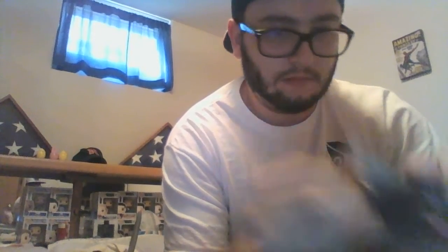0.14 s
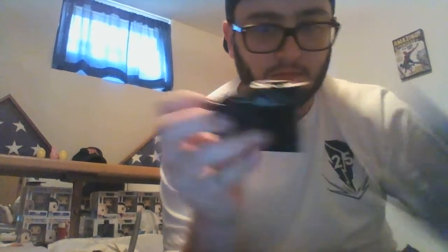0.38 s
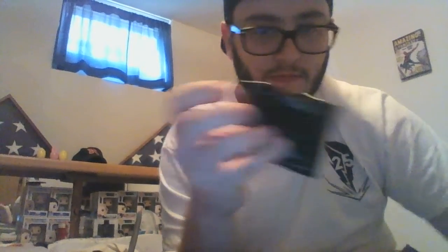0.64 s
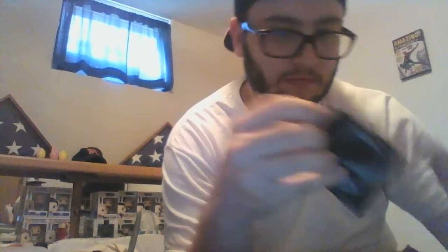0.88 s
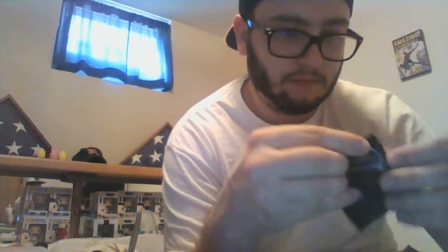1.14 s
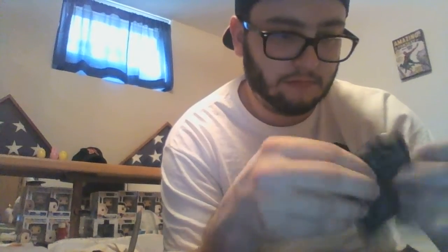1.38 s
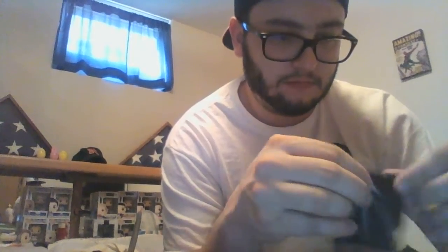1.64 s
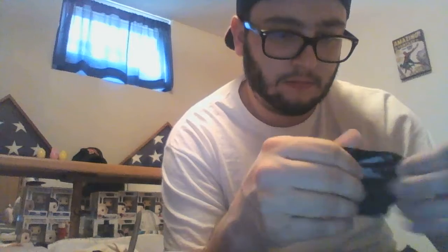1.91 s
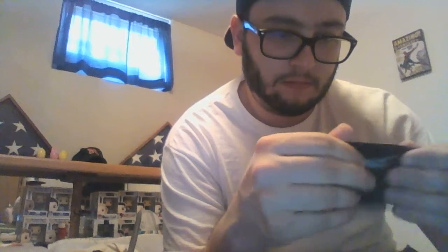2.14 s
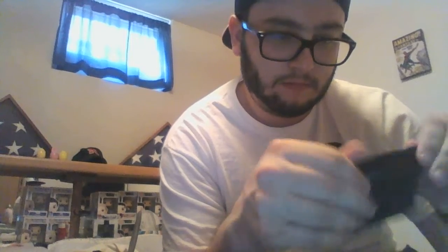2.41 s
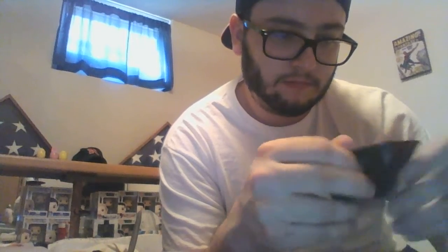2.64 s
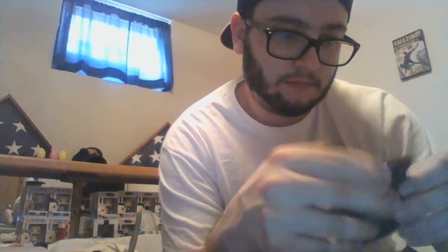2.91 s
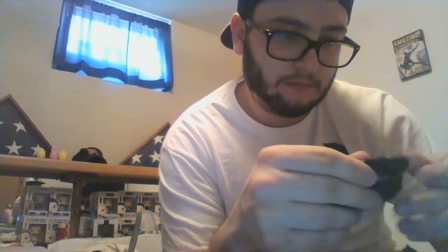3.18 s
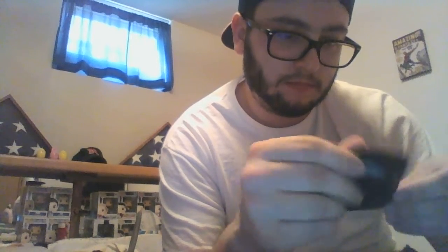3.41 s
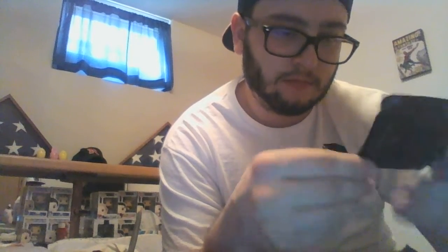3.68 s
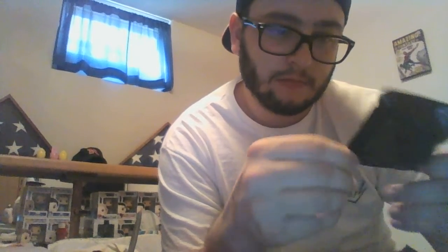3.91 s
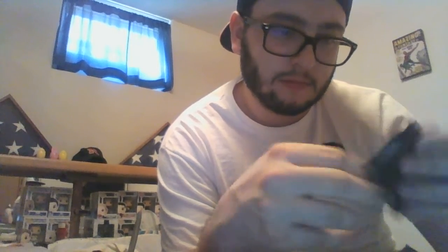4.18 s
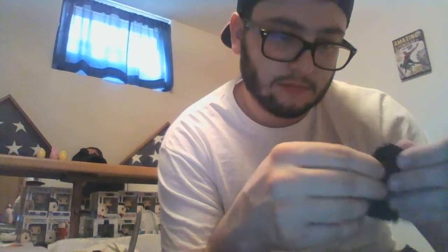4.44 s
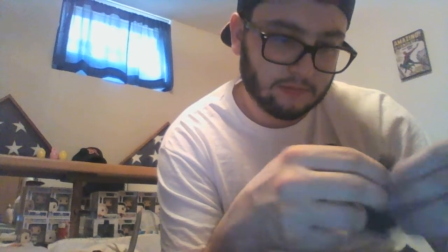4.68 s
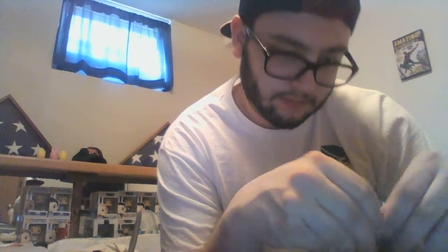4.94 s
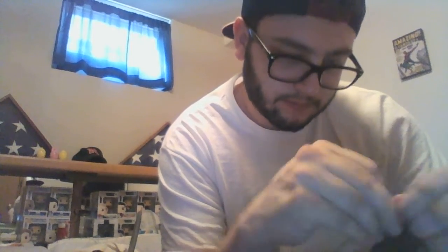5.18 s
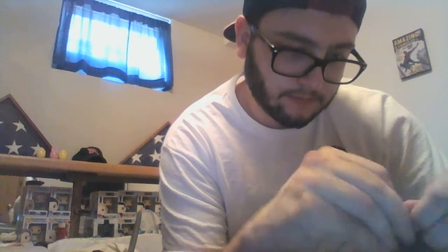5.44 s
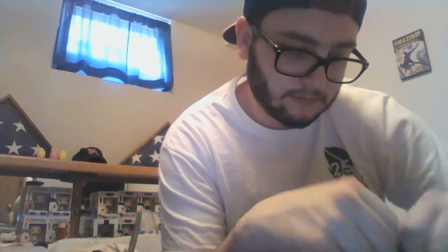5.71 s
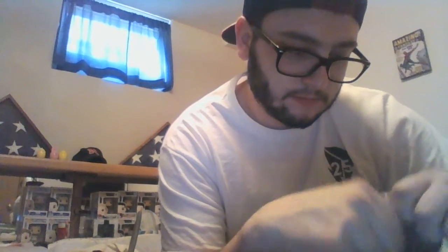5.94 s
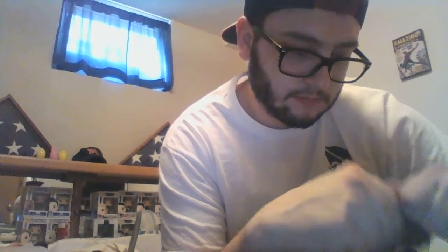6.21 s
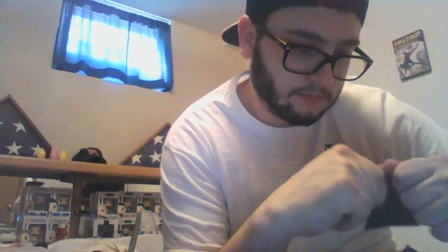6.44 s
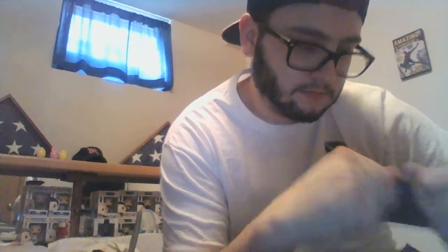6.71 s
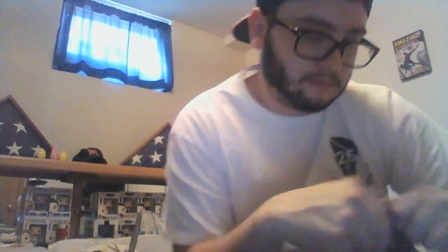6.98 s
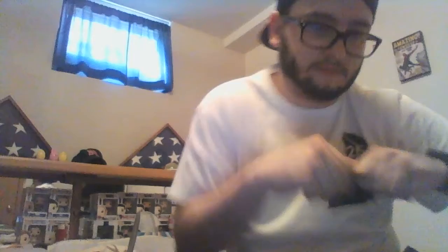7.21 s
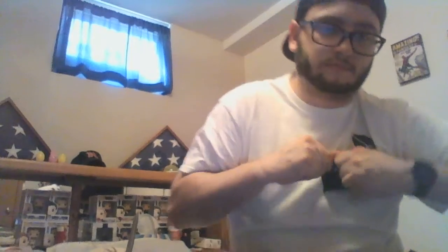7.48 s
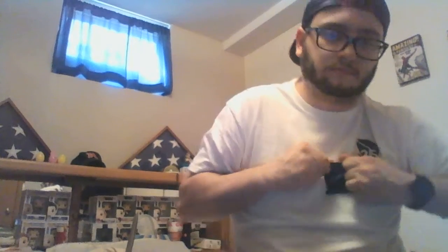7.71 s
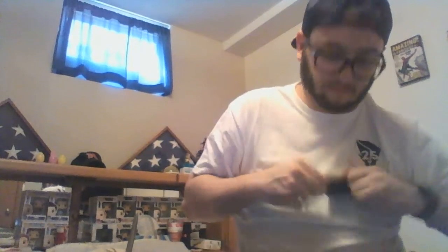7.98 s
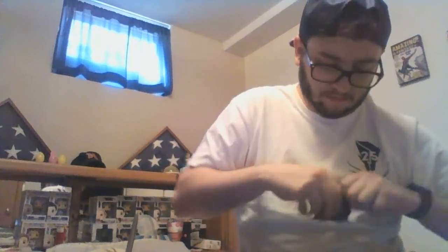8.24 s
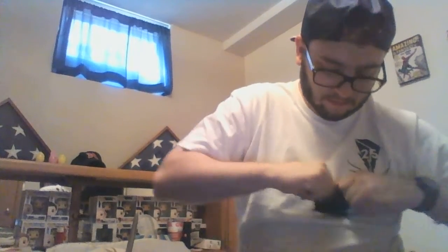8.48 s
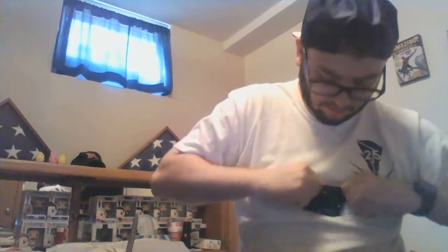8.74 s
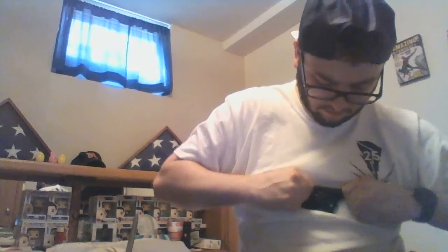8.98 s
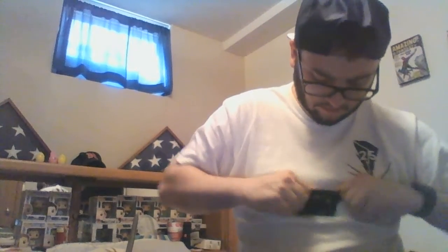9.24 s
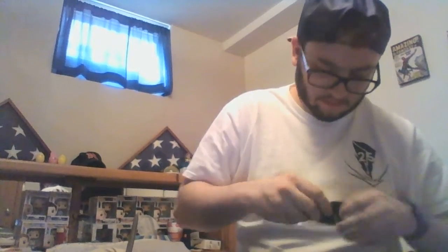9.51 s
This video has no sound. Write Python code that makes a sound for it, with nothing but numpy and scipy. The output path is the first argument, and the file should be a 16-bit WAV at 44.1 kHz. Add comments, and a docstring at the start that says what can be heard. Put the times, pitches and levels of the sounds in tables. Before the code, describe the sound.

Hands wrestle crackly plastic film, sharp crisp snaps and brief rustles in uneven flurries, over faint wavering buzz, hum and rumble.

```python
"""A low buzz and a burst of film rustle open at once with short ringing snaps, close to a webcam in a small room.
Hands tug at a stiff plastic pouch: slipping creases, shaped in bands of noise, snap, puff and shiver on.
Pulls bring flickering hiss and fine crackle; dull knocks, low bumps and one hollow scrape are shaped noise too.
The camera's frame clock leaks a pulse-wave buzz over mains hum and rumble; all three waver and dip together."""
import sys
import numpy as np
from scipy import signal
from scipy.fft import rfft, irfft
from scipy.io import wavfile
from scipy.ndimage import uniform_filter1d

SR = 44100
rng = np.random.default_rng(int(sys.argv[2]) if len(sys.argv) > 2 else 0)


def linear_from_db(decibels):
    """Turn decibels (scalar or array-like) into linear amplitude factors; 0 gives 1."""
    return 10 ** (np.asarray(decibels, float) / 20)


def master(y):
    """Save y as 16-bit WAV."""
    cut = np.clip(np.atleast_2d(y).T, -1, 1)
    pcm = np.round(cut * 32767)  # scale
    wavfile.write(sys.argv[1], SR, pcm.astype(np.int16))


N = 424241

# creases of the pouch that snap: (time [s], level over the loudest ms [dB], centre [Hz])
SNAPS = [(0.0097, -13.5, 3700), (0.0293, -11, 3770), (0.038, -20.5, 4720), (0.0551, -6.5, 2270),
         (0.0618, -10.5, 1650), (0.081, -4.5, 8250), (0.1002, -23, 5720), (0.118, -22.5, 5140),
         (0.2528, -16.5, 5580), (0.2727, -9, 7740), (0.4544, -30, 7500), (0.4839, -14.5, 6600),
         (0.516, -21.5, 4500), (0.5564, -16, 5450), (0.5765, -22.5, 4000), (0.666, -8.5, 4520),
         (0.671, -15.5, 1840), (0.9044, -12.5, 4930), (0.9105, -9.5, 6100), (0.9971, -8, 3180),
         (1.038, -13, 6260), (1.0476, -17, 7260), (1.059, -17.5, 5900), (1.089, -25, 4400),
         (1.1122, -22, 6740), (1.129, -19.5, 5800), (1.198, -16.5, 5200), (1.2127, -15.5, 5240),
         (1.2303, -31, 4300), (1.238, -22, 5600), (1.2678, -27, 1860), (1.295, -19, 5270),
         (1.321, -19.5, 4660), (1.3372, -11, 5030), (1.3804, -16.5, 5100), (1.4079, -13, 7400),
         (1.4204, -20.5, 2980), (1.453, -26, 6200), (1.4729, -18, 2770), (1.532, -11.5, 3900),
         (1.5575, -19.5, 7600), (1.5755, -13.5, 4800), (1.6136, -22, 7800), (1.6289, -22.5, 5900),
         (1.685, -17, 3860), (1.7038, -13, 4750), (1.734, -11, 6840), (1.761, -20.5, 6400),
         (1.77, -26, 5260), (1.803, -16, 8200), (1.8638, -16, 7900), (1.903, -22.5, 4500),
         (1.9508, -23, 10500), (2.0154, -14.5, 3340), (2.0621, -23.5, 3700), (2.139, -20.5, 1980),
         (2.2145, -26, 3230), (2.358, -36, 2400), (2.3816, -17.5, 2200), (2.401, -28.5, 3020),
         (2.4245, -22.5, 4280), (2.4417, -23, 5750), (2.477, -8.5, 4100), (2.49, -8.5, 4760),
         (2.531, -26.5, 6650), (2.5879, -16, 6760), (2.6026, -19.5, 3220), (2.6242, -19, 3780),
         (2.693, -21, 5070), (2.703, -13.5, 3860), (2.7258, -10, 3700), (2.7691, -17.5, 3400),
         (2.819, -29.5, 3480), (2.8961, -29.5, 3600), (2.931, -30.5, 2960), (2.949, -26.5, 5500),
         (2.9769, -10.5, 3040), (2.9854, -11, 5650), (3.0276, -19, 3100), (3.0473, -14.5, 1940),
         (3.0458, -12, 5500), (3.0575, -8.5, 3100), (3.103, -16, 3850), (3.1223, -7, 6800),
         (3.161, -25, 6370), (3.1799, -14, 6050), (3.264, -25.5, 5500), (3.3065, -21.5, 3180),
         (3.321, -14.5, 6940), (3.3465, -15, 4030), (3.455, -10, 3370), (3.4715, -14, 2900),
         (3.49, -13, 4700), (3.5282, -12.5, 5700), (3.565, -19.5, 4330), (3.5762, -15.5, 2650),
         (3.599, -12.5, 3270), (3.6154, -20, 3840), (3.6204, -17, 5940), (3.7707, -13, 4500),
         (3.981, -22, 3500), (3.9899, -10, 6350), (3.9992, -17, 4500), (4.0747, -16.5, 5030),
         (4.1365, -9, 3900), (4.1906, -9, 6700), (4.1957, -16.5, 5760), (4.22, -17.5, 4740),
         (4.238, -28, 3040), (4.2662, -32.5, 5740), (4.3272, -12.5, 6360), (4.409, -20, 2780),
         (4.431, -27.5, 5140), (4.456, -23, 3800), (4.476, -18, 3100), (4.5404, -23, 4830),
         (4.592, -17.5, 3900), (4.636, -10.5, 4130), (4.65, -23.5, 3000), (4.695, -17.5, 4050),
         (4.763, -26.5, 5700), (4.975, -28.5, 4500), (4.9867, -25.5, 4640), (5.0905, -18, 2420),
         (5.1359, -27.5, 4170), (5.214, -12, 5430), (5.2443, -30, 2200), (5.2591, -15.5, 3960),
         (5.291, -23.5, 1860), (5.3022, -30, 3480), (5.4452, -22, 6000), (5.4974, -10.5, 9500),
         (5.5, -20.5, 6100), (5.515, -7.5, 8100), (5.624, -20.5, 3520), (5.6307, -14.5, 2630),
         (5.642, -21.5, 2300), (5.714, -13.5, 2400), (5.7304, -29, 2700), (5.7408, -30.5, 2380),
         (5.8268, -15.5, 3660), (5.8378, -13.5, 4300), (5.8613, -20.5, 2570), (5.874, -14, 2830),
         (5.8846, -19.5, 3600), (5.901, -16.5, 5300), (5.9187, -17, 3230), (5.946, -16.5, 3140),
         (5.954, -24.5, 3500), (5.998, -13, 5130), (6.045, -23.5, 3920), (6.0809, -25, 3450),
         (6.205, -12.5, 4000), (6.2102, -12.5, 3930), (6.238, -16.5, 3950), (6.2518, -10, 4500),
         (6.2879, -6.5, 4300), (6.299, -18.5, 4100), (6.3244, -25, 3600), (6.336, -17.5, 3570),
         (6.471, -21.5, 2580), (6.476, -22, 4000), (6.861, -28, 2500), (6.89, -25.5, 2570),
         (6.943, -23, 3320), (7.033, -20, 5560), (7.1665, -19.5, 3930), (7.1785, -16, 3260),
         (7.2003, -11, 4930), (7.2072, -10, 6100), (7.229, -29.5, 4200), (7.2405, -16, 8240),
         (7.2551, -17.5, 4050), (7.263, -29.5, 4400), (7.2818, -16, 2740), (7.324, -18.5, 5100),
         (7.346, -18, 4900), (7.4642, -26, 2560), (7.496, -18.5, 4000), (7.5848, -10.5, 5200),
         (7.595, -17.5, 6900), (7.645, -21.5, 4750), (7.7546, -29.5, 2720), (7.763, -29.5, 2290),
         (7.832, -31, 2510), (7.9107, -9, 1650), (7.9205, -14, 3570), (7.9659, -23, 3600),
         (7.9728, -16.5, 4750), (8.024, -12, 3100), (8.045, -18, 6800), (8.0654, -16, 5740),
         (8.268, -16.5, 6200), (8.276, -16.5, 3300), (8.3038, -17, 5130), (8.3236, -11.5, 6540),
         (8.3341, -27, 4800), (8.3642, -28, 5000), (8.3903, -13, 8200), (8.3935, -7, 2700),
         (8.4146, -14, 4000), (8.4204, -12, 3800), (8.4656, -25.5, 4240), (8.5737, -21, 2560),
         (8.58, -24, 5700), (8.623, -22, 6750), (8.76, -9.5, 1890), (8.9159, -24, 7250), (8.973, -43, 2300),
         (9.10, -38.5, 2260), (9.188, -14.5, 4080), (9.222, -12.5, 5540), (9.2281, -16.5, 7000),
         (9.3469, -21, 7340), (9.4315, -28, 3000), (9.4456, -24.5, 4300), (9.4777, -16, 6200),
         (9.54, -20.5, 5200), (9.552, -28.5, 4400), (9.5873, -20, 4500)]
GRIP_DB_PER_S = 489  # how fast a pull or scrape swells


def unit(x):
    """Scale to rms 1."""
    return x / np.sqrt(np.mean(x ** 2))


def band(x, lo_hz, hi_hz):
    """Causal band-pass."""
    sos = signal.butter(2, [lo_hz, min(hi_hz, .45 * SR)], "band", fs=SR, output="sos")
    return signal.sosfilt(sos, x)


def colour(x, points):
    """Shape a steady sound by (Hz, dB) points, to rms 1."""
    hz, db = np.transpose(points)
    f = np.maximum(np.arange(N // 2 + 1) * SR / N, 1)
    gain = linear_from_db(np.interp(np.log(f), np.log(hz), db))
    return unit(irfft(rfft(x) * gain, N))


def walk(rate):
    """Random levels held 1 / rate s and slewed; spread 1."""
    k = int(SR / rate)
    steps = np.repeat(rng.standard_normal(N // k + 1), k)
    return unit(uniform_filter1d(steps, k)[:N])


def flicker(spread_db, rate):
    """Noise whose level wanders, as of uneven rubbing."""
    return linear_from_db(spread_db * walk(rate)) * rng.standard_normal(N)


def plateau(start_s, held_s, rise, fall):
    """dB below the top of a shape that rises, holds and falls at steady dB per s."""
    t = np.arange(N) / SR
    return -np.maximum(0, np.maximum((start_s - t) * rise, (t - start_s - held_s) * fall))


def electronics():
    """A pulse wave at half the frame rate sags through the coupling capacitor; hum and rumble lie under it."""
    # rumble under the microphone: (frequency [Hz], relative level per Hz [dB])
    rumble_colour = [(12, -26), (20, -6.5), (43, -9.5), (170, -13.5), (333, -23.5), (600, -23),
                     (1200, -51.5), (3000, -70)]
    # brief dips of the whole floor: (time [s], depth [dB], held [s])
    floor_dips = [(.15, 8, 0.034), (.33, 14, 0.31), (1.09, 15, 0.034), (1.36, 13, 0.18), (1.60, 14, 0.3),
                  (3.17, 4.5, 0.15), (6.309, 14, 0.14), (6.498, 4.5, 0.24), (8.40, 8.5, 0.29),
                  (8.80, 22, 0.069), (8.951, 13.5, 0.13)]
    floor_db, dip_db_per_s, return_db_per_s = -56.5, 294.5, 123
    buzz_hz, hum_hz = 14.9689, 119.998
    t = np.arange(N) / SR
    phase = t * buzz_hz % 1
    pulse = 1. * ((phase > .268) & (phase < .742))
    coupling = signal.butter(1, [14., 300.], "band", fs=SR, output="sos")
    buzz = unit(signal.sosfilt(coupling, pulse))
    hum = np.sin(2 * np.pi * hum_hz * t)
    rumble = colour(rng.standard_normal(N), rumble_colour)
    depths = [np.maximum(0, db + plateau(s, held, dip_db_per_s, return_db_per_s))
              for s, db, held in floor_dips]
    waver_db = 1.5 * walk(8) - np.max(depths, axis=0)
    return linear_from_db(floor_db + waver_db) * (linear_from_db(11.5) * buzz + linear_from_db(0.5) * hum + linear_from_db(3.0) * rumble)


REST_DB = -58.5  # rustle of hands at rest


def sliding():
    """Strength of bright and dull rustle: pulls, film settling after each snap, hands at rest; powers add."""
    # pulls, while the fingers slide at full strength:
    # (time [s], length [s], level [dB], flexing of the whole pouch re that level [dB])
    pulls = [(0.0, 0.038, -33.5, -9.5), (0.055, 0.078, -20.5, -16.5), (0.204, 0.041, -22.5, -13.5),
             (0.457, 0.15, -42.5, -41.5), (0.691, 0.16, -47, -17), (0.829, 0.053, -38.5, -24.5),
             (0.928, 0.22, -40, -31), (1.217, 0.35, -39.5, -15), (1.681, 0.095, -33.5, -28.5),
             (1.892, 0.025, -34.5, -22), (2, 0.54, -57, -4), (2.39, 0.2, -51, -13),
             (2.681, 0.17, -50.5, -7), (2.952, 0.17, -34.5, -13.5), (3.266, 0.012, -42.5, -14.5),
             (3.331, 0.013, -30.5, -16), (3.453, 0.19, -37.5, -16.5), (3.962, 0.14, -44.5, -10.5),
             (4.212, 0.012, -35.5, -10), (4.352, 0.48, -45, -20.5), (4.922, 0.095, -51, -18),
             (5.435, 0.11, -44.5, -14), (5.622, 0.043, -35, -16.5), (5.824, 0.24, -41.5, -14),
             (6.211, 0.039, -45.5, -3.5), (6.759, 0.099, -41.5, -25), (6.849, 0.04, -20, -37.5),
             (6.94, 0.17, -40, -19.5), (7.162, 0.25, -45, -10), (7.317, 0.23, -51, -7),
             (7.759, 0.084, -55, -2.5), (7.959, 0.24, -31, -21), (8.25, 0.094, -32, -15),
             (8.4, 0.038, -25, -19), (8.542, 0.19, -51.5, -5), (9.178, 0.087, -34.5, -23.5),
             (9.324, .40, -36.5, -19)]
    let_go_db_per_s = 269.5
    settle_db, settle_db_per_s = -25.5, 261.5  # settling film, re the snap, and its decay
    settle_flex_db = -19  # flexing re rustle, settling or at rest
    kicks = np.zeros(N)
    for s, db, _ in SNAPS:
        kicks[int(s * SR)] += linear_from_db(db + settle_db) ** 2
    settling = signal.lfilter([1], [1, -linear_from_db(-settle_db_per_s / SR) ** 2], kicks)
    slide = settling + linear_from_db(REST_DB) ** 2
    flex = slide * linear_from_db(settle_flex_db) ** 2
    for s, held, db, flex_db in pulls:
        power = linear_from_db(db + plateau(s, held, GRIP_DB_PER_S, let_go_db_per_s)) ** 2
        slide = slide + power
        flex = flex + power * linear_from_db(flex_db) ** 2
    return np.sqrt(slide), np.sqrt(flex)


def crackle(rate, spread_db):
    """Tiny creases at random moments, rate per s, most small, a few large."""
    when, size, sign = rng.random(N), rng.exponential(size=N), rng.uniform(-0.9, 1, N)
    return unit((when < rate / SR) * linear_from_db(spread_db * np.minimum(size, 3)) * sign)


def grains():
    """Fine crackle; each patch of film ticks in its own range and in uneven flurries, each fold with its own colour."""
    # patches of film that crackle on their own: (low edge [Hz], high edge [Hz])
    patches = [(1200, 3000), (2500, 6000), (5000, 14000)]
    ticks = 0
    for lo, hi in patches * 4:  # four folds in each patch
        shape = rng.standard_normal(132) * np.exp(-np.arange(132) / 37.0)
        flurries = crackle(60, 2.1) * linear_from_db(3.45 * walk(25))
        fold = np.convolve(flurries, shape)[:N]
        ticks = ticks + unit(band(fold, lo, hi)) * np.sqrt(hi - lo)
    return unit(ticks)


def handling():
    """Sliding fingers make a flickering hiss full of fine crackle; the more the pouch flexes, the fuller it is."""
    # colour of the rustling film: (frequency [Hz], relative level per Hz [dB])
    rustle_colour = [(880, -50.5), (1500, -2.5), (2600, 4), (4500, 0), (9650, -2), (12200, -9),
                     (16000, -17.5)]
    body_hz, body_share = 4500, 0.62  # below this it follows the flexing, by this share in dB
    fold_db, folds_per_s = 2.8, 10  # the film's colour wanders as its folds change
    slide, flex = sliding()
    fullness = (flex / slide) ** body_share
    busy = np.sqrt(1 - (linear_from_db(REST_DB) / slide) ** 2) * fullness  # creases move when it flexes
    raw = flicker(4, 70) + linear_from_db(9) * busy * grains()
    film = 0
    for hz in 1000 * 2 ** np.arange(0, 4.1, .5):
        forward = band(raw, hz / 1.28, hz * 1.2)
        part = band(forward[::-1], hz / 1.1, hz * 1.3)[::-1]  # backward pass offsets the delay
        film = film + linear_from_db(fold_db * walk(folds_per_s)) * part
    film = colour(film, rustle_colour)
    sheen = signal.sosfiltfilt(signal.butter(1, body_hz, "high", fs=SR, output="sos"), film)
    body = linear_from_db(0.5) * fullness * (film - sheen)
    rub = flicker(3, 60) + linear_from_db(1) * crackle(90, 4)
    dull = unit(band(rub, 700, 1700)) + linear_from_db(-11) * unit(band(rub, 300, 600))
    return slide * (sheen + body) + linear_from_db(4.5) * flex * dull


def slips(rise_s):
    """A crease gives way in a few uneven slips that swell and die within ms."""
    t = np.arange(SR // 40) / SR
    return rng.standard_normal(len(t)) ** 3 * t * np.exp(-t / rise_s)


def snap(hz):
    """Slips shake the sheet broadly around its centre, with a brief ring, the pouch's own note, a skirt and a puff."""
    puff_db, puff_spread_db = -25, 6  # air squeezed out of the pouch, re the click
    push = slips(0.00098 * np.exp(0.34 * rng.standard_normal()))
    ring_hz = hz * np.exp(0.12 * rng.standard_normal())
    body = band(push, hz / 2.08, hz * 1.83)
    ring = band(push, ring_hz / 1.18, ring_hz * 1.18)
    pouch = band(push, 2085, 3456)  # the whole pouch answers every snap here
    skirt = band(push, 1400, min(13000, 3.8 * hz))
    click = unit(body) + linear_from_db(-3) * unit(ring) + linear_from_db(-1) * unit(skirt)
    click = band(click + linear_from_db(-9.5) * unit(pouch), 1100, 12000)
    loudest_ms = uniform_filter1d(click ** 2, size=SR // 1000).max()
    click = click / np.sqrt(2 * loudest_ms)
    puff = band(push, 230, 852)
    puff_gain = linear_from_db(puff_db + puff_spread_db * rng.standard_normal())
    return click + puff_gain * puff / np.abs(puff).max()


def shiver(hz):
    """The struck patch rings on in a narrow range over broader noise, both fading; low patches shiver harder."""
    level_db, db_per_oct, t60_s = -28.5, -1.5, 0.26  # level re the strike, slope re 3 kHz
    t = np.arange(SR // 4) / SR
    noise = rng.standard_normal(len(t))
    narrow = unit(band(noise, hz / 1.11, hz * 1.11))
    broad = unit(band(noise, hz / 2.0, hz * 1.45))
    sound = unit(narrow + linear_from_db(11.0) * broad)
    fade = np.exp(-np.log(1000) * t / t60_s)
    onset = np.minimum(t / 0.0053, 1)
    return linear_from_db(level_db + db_per_oct * np.log2(max(hz / 3000, .5))) * sound * fade * onset


def bump(hz):
    """A slow push through the desk rocks the camera for a few uneven cycles."""
    t = np.arange(SR // 4) / SR
    thud = band(rng.standard_normal(len(t)), hz / 2.0, hz * 4.0) * t * np.exp(-t / 0.019)
    return thud / np.abs(thud).max()


def knock(hz):
    """A softer contact rings the hollow pouch for a few cycles."""
    thud = band(band(slips(0.0024), hz / 2.1, hz * 1.3), 200, 1600)
    return thud / np.abs(thud).max()


def scrape():
    """Uneven rubbing noise rings one hollow resonance as the pouch drags over a hollow surface."""
    start_s, held_s, level_db, hz = 0.12, 0.16, -30.5, 1194
    rub = flicker(3, 60)
    hollow = unit(band(band(rub, hz / 1.3, hz * 1.2), hz / 1.5, hz * 1.3))
    return linear_from_db(level_db + plateau(start_s, held_s, GRIP_DB_PER_S, GRIP_DB_PER_S)) * hollow


def play(table, voice, lead_s):
    """Sound every row of an event table lead_s early, each with its shiver."""
    out = np.zeros(N + SR)
    for s, db, hz in table:
        start = max(int((s - lead_s) * SR), 0)
        for sound in (voice(hz), shiver(hz)):
            out[start:start + len(sound)] += linear_from_db(db) * sound
    return out[:N]


def room(x):
    """Walls answer after a few ms with a short tail, duller as it fades."""
    t60_s, tail_db = 0.092, -15
    t = np.arange(SR // 2) / SR
    fade = np.log(1000) * t / t60_s
    noise = rng.standard_normal(len(t)) * (t > .004)
    tail = band(noise, 160, 6800) * np.exp(-fade)
    tail = tail + band(noise, 5400, 11000) * np.exp(-1.5 * fade)  # treble dies sooner
    tail = tail / np.sqrt(np.sum(tail ** 2))
    return x + linear_from_db(tail_db) * signal.fftconvolve(x, tail)[:N]


def scene():
    """Snaps and knocks in the room, with rustle, scrape, bumps and the camera's own noise at the microphone."""
    # dull knocks of the figure inside against pouch and fingers: (time [s], peak level [dB], ring [Hz])
    knocks = [(0.06, -17, 435), (0.664, -4.5, 1200), (0.831, -18.5, 895), (1.517, -22, 1180),
              (2.587, -28.5, 573), (2.974, -26.5, 960), (3.024, -18, 1300), (4.191, -26, 980),
              (5.213, -29.5, 417), (5.502, -25.5, 860), (7.031, -25, 595), (7.165, -27.5, 830),
              (7.909, -22, 1520), (8.02, -26, 990), (8.066, -27.5, 950)]
    # low bumps through the desk: (time [s], peak level [dB], ring [Hz])
    bumps = [(.055, -30, 59), (.27, -45, 94), (6.78, -33.5, 24)]
    pouch = play(SNAPS, snap, lead_s=.001) + play(knocks, knock, lead_s=0.00049)
    desk = play(bumps, bump, lead_s=0.0024)
    mix = room(pouch) + handling() + scrape() + desk + electronics()
    return mix[None]


def band_limit(x):
    """A steep low-pass at the top of the band."""
    return signal.sosfilt(signal.butter(12, 16530, fs=SR, output="sos"), x)


def record(dry):
    """The microphone capsule rolls off the top, then the input stage rounds the highest peaks."""
    capsule = signal.sosfilt(signal.butter(4, 13500, fs=SR, output="sos"), dry)
    mix = 0.88 * np.tanh(capsule / 0.99)
    return band_limit(mix)


dry = scene()
out = record(dry)
master(out)
```